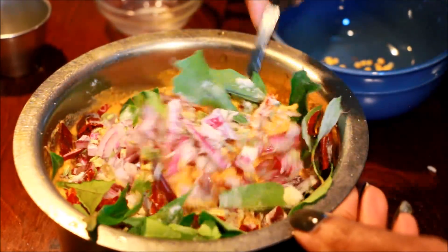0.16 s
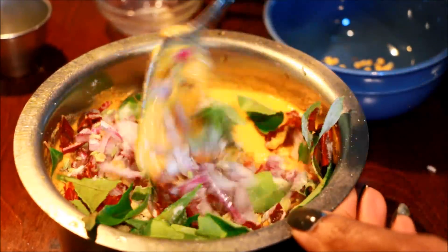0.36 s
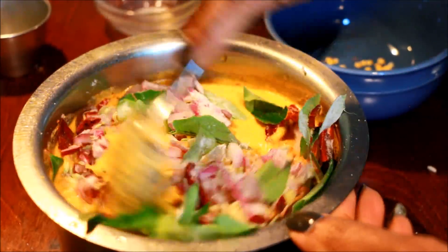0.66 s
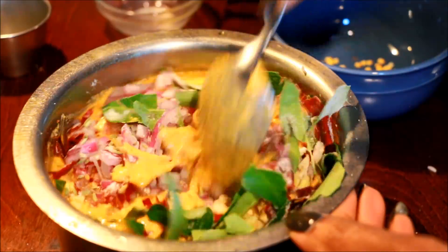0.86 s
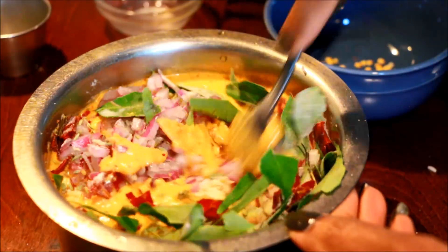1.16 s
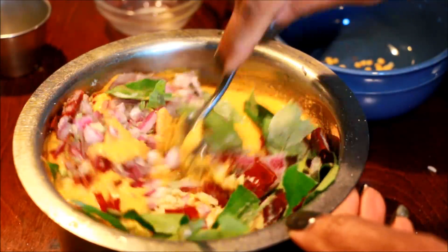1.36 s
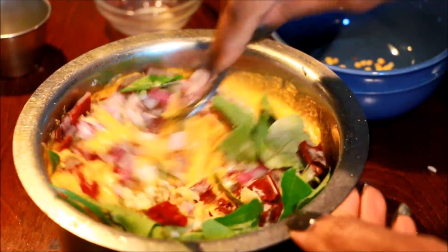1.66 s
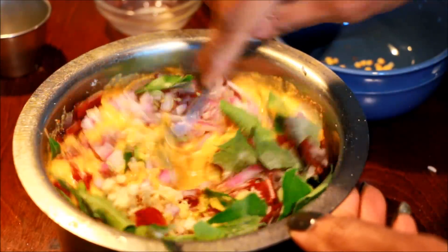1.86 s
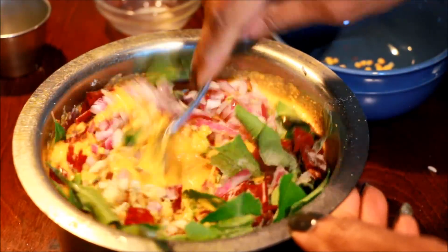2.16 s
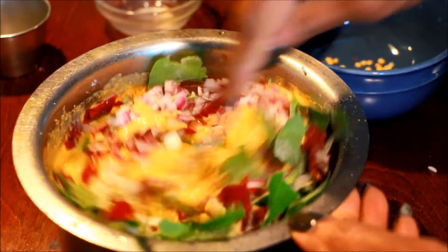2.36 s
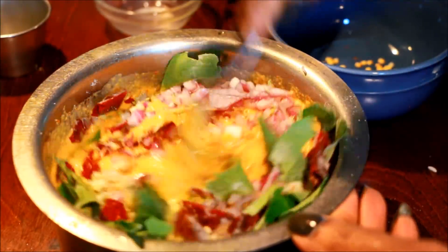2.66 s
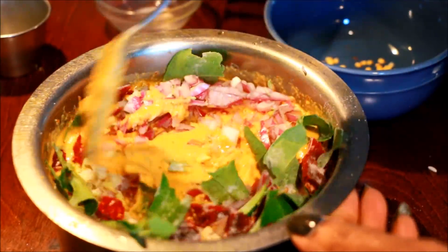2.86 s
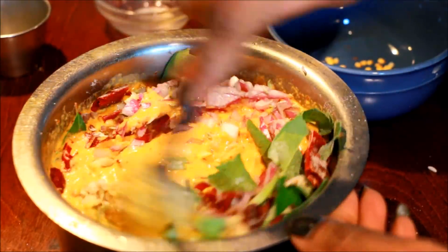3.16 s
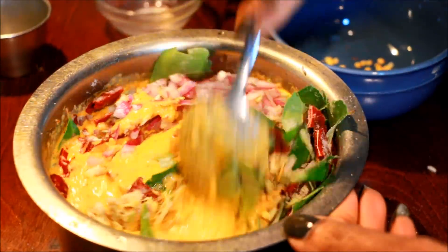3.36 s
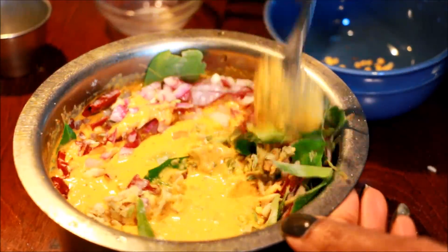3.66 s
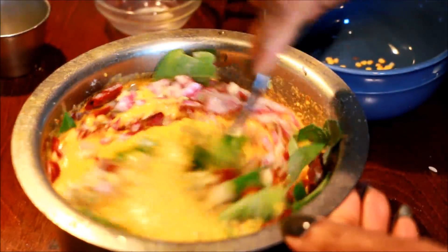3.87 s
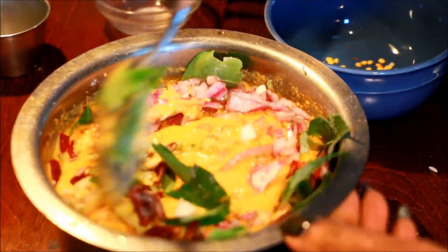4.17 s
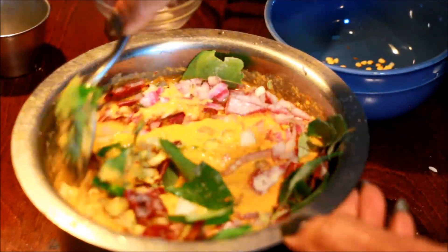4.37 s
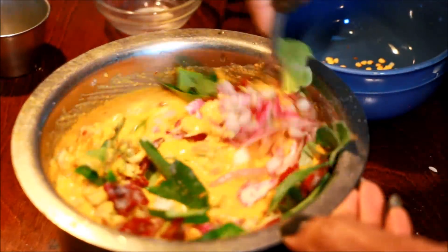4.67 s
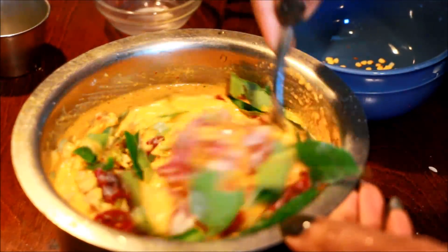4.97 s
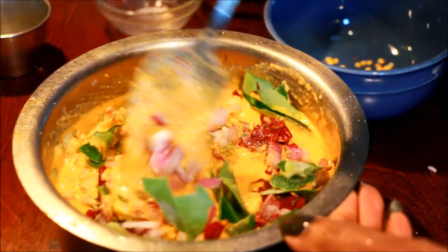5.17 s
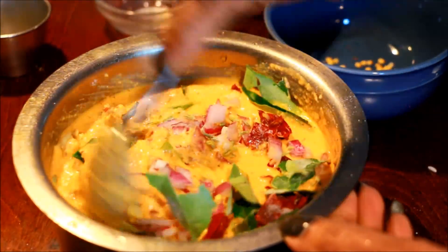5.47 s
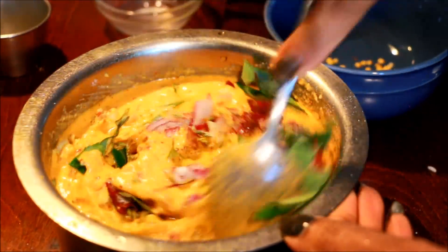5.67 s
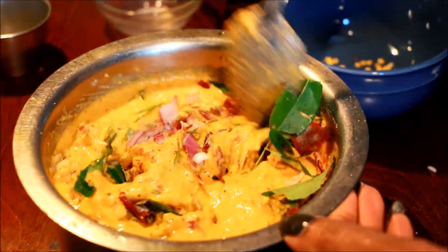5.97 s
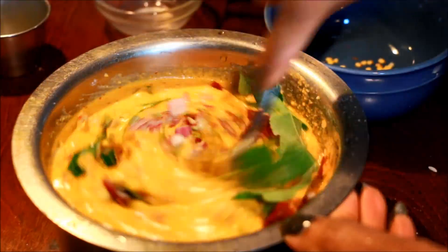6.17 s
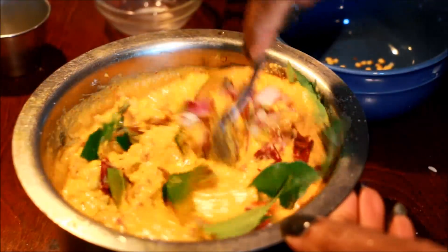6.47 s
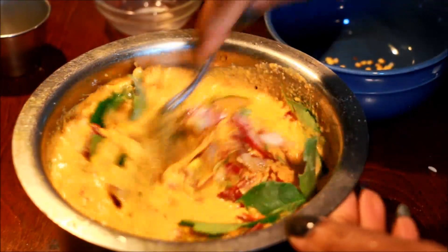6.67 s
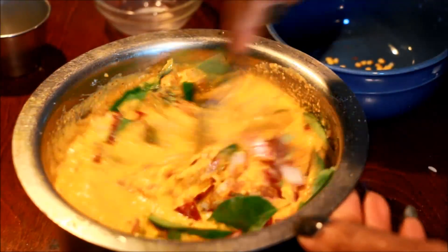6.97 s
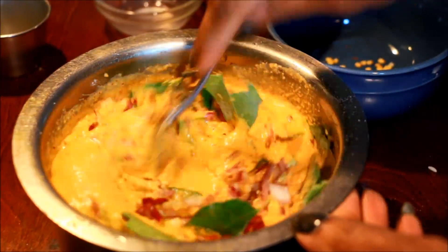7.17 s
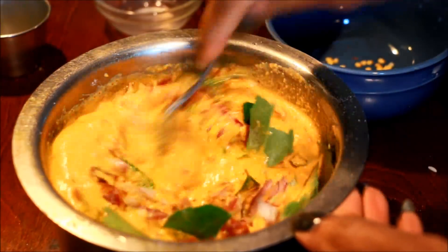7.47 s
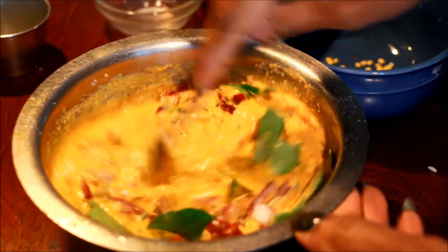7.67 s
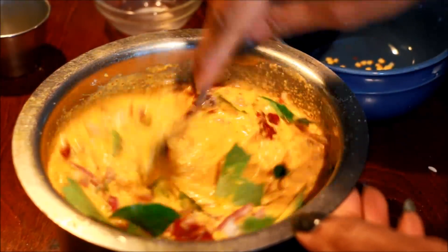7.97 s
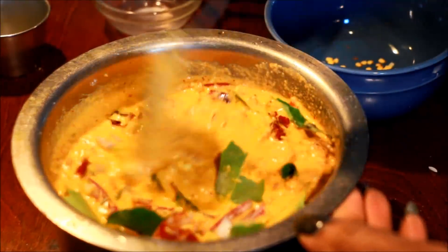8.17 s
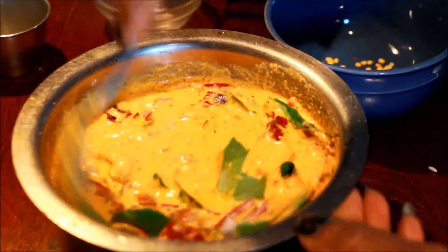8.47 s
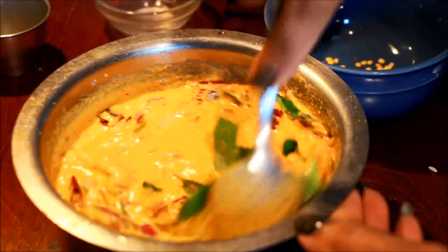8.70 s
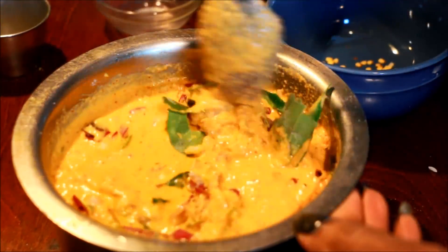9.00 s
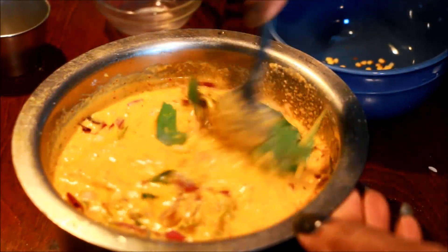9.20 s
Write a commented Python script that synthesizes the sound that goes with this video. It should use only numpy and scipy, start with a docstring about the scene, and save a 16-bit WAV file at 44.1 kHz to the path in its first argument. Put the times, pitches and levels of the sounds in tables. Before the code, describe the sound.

In a quietly humming kitchen, thick batter crackles and squelches softly as a metal spoon folds through it. Three bursts of scraping, damped knocking and clinking on the steel bowl follow, the second short and the last longest, with gentle wet stirring between them. The bowl thumps lightly on the table, two faint squeaks slip in, and everything is muted for a moment after the second burst. The microphone is close.

```python
"""A steel spoon stirs thick batter in a steel bowl on a wooden table, close to a small stereo microphone.
The spoon knocks and drags on the batter-damped wall; its edge hisses and clinks on the bare steel above.
Air pockets in the batter crackle, smack and squelch, the bowl bumps the table, and twice there is a
faint squeak. A quiet kitchen hums behind; once the whole sound is muted for a moment."""
import sys
import numpy as np
from scipy import signal
from scipy.io import wavfile
from scipy.ndimage import uniform_filter1d

SR = 44100
rng = np.random.default_rng(int(sys.argv[2]) if len(sys.argv) > 2 else 0)


def digitize_waveform(pressure):
    """Quantize a signal to 16-bit integers and store it at the path in sys.argv[1].

    Rows of a 2-D input are taken as channels; values are limited to [-1, 1].
    """
    field = np.atleast_2d(pressure).T
    bounded = np.clip(field, -1, 1)
    quanta = np.round(bounded * 32767).astype(np.int16)
    wavfile.write(sys.argv[1], SR, quanta)


N = 411894

# Levels are fader settings ahead of the mix; favour_hz is the pitch the struck spot brings out.
# the bowl's body, damped by batter and hand: pitch_hz, level_db, t60_s
BOWL_MODES = [(195, -22.5, 0.074), (280, -17.5, 0.16), (307.5, -13.5, 0.11), (335, -3, 0.19),
              (362.1, -9, 0.19), (385, -2.5, 0.2), (485.3, 5, 0.069), (553, -7.5, 0.12), (680, 3, 0.055),
              (790, 3, 0.038), (981, 5, 0.035), (1131, 3, 0.032), (1288, -7, 0.092), (1522, -12, 0.16),
              (1792, 0, 0.035), (2340, -15, 0.049), (2590, -26.5, 0.074), (3330, -49.5, .06),
              (3700, -33, .05), (4210, -35, 0.046)]
# the bare upper wall, singing under the edge: pitch_hz, width_hz, level_db
WALL_TONES = [(1300, 28, -9), (1600, 38, 0), (1810, 37, -6.5), (2110, 55, -0.5), (2340, 45, -6.5),
              (2600, 49, -2.5), (2773, 33, -3), (3030, 40, -5), (3250, 37, -3), (3460, 40, -6),
              (3650, 39, 1.5), (3860, 31, 3.5), (4210, 43, 2.5), (4740, 49, -4), (5140, 70, -5),
              (5640, 36, -1), (6490, 55, -4.5), (6900, 60, -8), (7430, 50, -8.5)]
# the table top under the bowl: pitch_hz, level_db, t60_s
TABLE_MODES = [(138, -2, 0.24), (178, 0, 0.073)]
# dips where neighbouring modes cancel: pitch_hz, width_hz
HOLLOWS = [(440, 21), (600, 24), (900, 32)]
# the spoon folds through the batter: start_s, length_s, hiss_db, treble_offset_db, drag_db
FOLDS = [(0.304, 0.21, -78, 0, -62), (0.603, 0.34, -64, 8, -64.5), (0.804, 0.3, -74, 11, -74),
         (0.975, 0.55, -64.5, -0.5, -65), (2.97, 0.46, -72.5, 16, -68), (3.58, 0.33, -60, 4.5, -70),
         (3.85, 0.34, -73.5, 12, -62), (4.783, 0.36, -74, 10, -83), (5.732, 0.5, -65, 8.5, -86),
         (6.23, 0.15, -57.5, 1, -81), (6.284, 0.29, -56.5, -4, -73), (6.488, 0.3, -66.5, -1, -62.5),
         (6.82, 0.29, -69, -16, -59), (8.724, 0.32, -65, 8.5, -51.5), (8.883, 0.48, -63.5, -10, -57)]
# the edge scrapes the wall: start_s, length_s, hiss_db, treble_offset_db, drag_db, hardness_share
SCRAPES = [(1.527, 0.061, -53, -5, -36, 0.3), (1.6, 0.081, -81, 16, -64, 0),
           (1.733, 0.081, -46.5, 0.5, -39.5, 0.82), (1.81, 0.087, -64, 0, -36, 0.21),
           (1.913, 0.13, -60, -4, -37.5, 0.18), (1.943, 0.031, -60, -5, -60, .3),
           (2.11, 0.021, -50.5, -0.5, -60, .3), (2.231, 0.013, -55, 0, -60, .3),
           (2.069, 0.077, -55.5, -9, -37.5, 0.24), (2.15, 0.056, -67, -6, -40, 0.16),
           (2.22, 0.068, -70, -15, -39.5, 0.36), (2.322, 0.096, -53, -3, -38.5, 0.14),
           (2.412, 0.081, -41, -2.5, -44.5, 0.4), (2.497, 0.13, -46.5, -1.5, -38, 0.48),
           (3.887, 0.06, -72, -17, -48, 0.1), (4.378, 0.048, -65, -3, -45, 0.1),
           (4.444, 0.12, -64, 6, -51.5, 0.27), (4.587, 0.065, -49.5, -4.5, -41.5, 0.54),
           (4.665, 0.068, -49.5, -0.5, -32.5, 0.35), (4.748, 0.029, -47.5, -4, -36.5, 0.45),
           (6.714, 0.14, -73, -12, -48.5, 0.5), (7.089, 0.015, -53, -2, -25, 0.8),
           (7.15, 0.17, -74, -5, -48, 0.15), (7.351, 0.037, -58, -11, -38, 0.6),
           (7.397, 0.15, -66, -14, -43.5, 0.13), (7.572, 0.08, -57, -7, -46, 1),
           (7.65, 0.097, -69, -11, -42, 0.1), (7.732, 0.045, -38.5, -8.5, -40.5, 1),
           (7.771, 0.067, -45.5, 5, -39, 0.7), (7.841, 0.044, -56, -4, -41, 1),
           (7.895, 0.13, -44, -4.5, -41.5, 0.53), (8.019, 0.066, -45.5, 2.5, -46, 0.45),
           (8.072, 0.072, -48.5, -2, -41, 1), (8.129, 0.12, -49.5, -7.5, -38.5, 0.43),
           (8.244, 0.023, -39.5, -4, -60, .2), (8.283, 0.046, -45, -0.5, -37.5, 0.6),
           (9.296, 0.034, -54, -20, -52, 0.2)]
# release as the edge lifts, a row each for low hiss, high hiss, soft drag, hard drag: t60_s
LIFT_T60_S = [
    [0.18],
    [0.08],
    [0.15],
    [0.063],
]
# the dragged bowl's note sinks as the batter loosens: time_s, favour_hz
DRAG_NOTE = [(2.7, 378.2), (7.0, 348.3)]
# tone colour of the edge's hiss: pitch_hz, density_db
EDGE_COLOUR = [(530, -23.5), (900, -8.5), (990, -5.5), (1380, -6), (1580, -4.5), (1890, -3), (2130, -4),
               (4120, -6), (4930, -8), (10900, -12), (15700, -19.5)]
# short slips of the edge: start_s, level_db, treble_offset_db
SLIPS = [(1.1558, -40, -6), (1.541, -24.5, -27), (1.689, -45, 7), (1.7447, -29, -15), (1.8672, -33, -14),
         (1.959, -25, -7.5), (1.9865, -29, -5), (2.249, -34, 5), (2.356, -50, -10), (2.405, -30, 5),
         (3.1882, -56, 2), (3.676, -38, 2), (3.8412, -32, -12), (3.863, -31, -14), (3.8901, -35, -10),
         (4.421, -33, -5), (4.56, -33, -23), (4.5787, -23, -13), (4.6094, -35, -9), (4.6776, -47, 10),
         (4.727, -36, 4), (6.2148, -42, -8), (6.2687, -35, -3), (6.3904, -41, -6), (6.556, -43, 3),
         (6.6253, -61, -7), (6.7471, -35, -16), (6.8513, -53, -17), (7.1114, -48.5, 14), (7.118, -52, 6),
         (7.226, -40, 0), (7.351, -36, -19), (7.3786, -32, -7), (7.39, -39.5, 7), (7.4884, -44, -7),
         (7.504, -39, -1), (7.6425, -40, 9), (7.7478, -33, -12), (7.7672, -39, -11), (7.9129, -55, -7),
         (8.0225, -20.5, -20), (8.108, -26, -6), (8.2615, -28, -14), (8.307, -33, -7), (9.3322, -21.5, -19)]
# tone colour of the kitchen's hum: pitch_hz, density_db
ROOM_TONE_COLOUR = [(12, -29.5), (20, -5), (116, 3), (186, -6.5), (335, -4), (523, -11), (773, -12),
                    (1240, -17.5), (1550, -16.5), (3210, -42.5), (4240, -24), (9260, -25.5), (15700, -32)]
# how alike left and right are in the noise layers: pitch_hz, likeness_share
STEREO_LIKENESS = [(60, 1), (400, 0.75), (1000, 0.39), (2500, 0.25), (6000, 0.036), (15000, 0.28)]
# the kitchen's reverb time: pitch_hz, t60_s
KITCHEN_DECAY = [(200, 0.29), (1000, 0.46), (4000, 0.044), (14000, 0.21)]
# air pockets burst: start_s, level_db, pitch_hz
SMACKS = [(0.0993, -37, 4400), (0.1331, -47, 2650), (0.7662, -52, 2070), (2.968, -50, 7500),
          (3.17, -39, 5500), (3.189, -39, 4600), (3.265, -40, 4800), (3.341, -46, 11000),
          (3.865, -36.5, 1740), (4.423, -34, 2860), (4.878, -33, 8060), (5.967, -44, 2480),
          (6.2155, -40.5, 1970), (6.2937, -47, 2690), (6.346, -41, 2910), (6.3895, -32, 2020),
          (6.452, -45, 2520), (6.557, -45, 4620), (6.6253, -46, 1540), (6.853, -48, 4000),
          (6.887, -45, 2810), (7.008, -41, 10100), (7.4884, -39, 1600), (7.5032, -32.5, 5330),
          (7.5142, -35, 1460), (9.3327, -38, 1900)]
# air pockets are pressed: start_s, length_s, first_hz, last_hz, level_db
SQUELCHES = [(0.652, .06, 1520, 2100, -56), (0.741, 0.07, 2250, 1930, -54), (.72, 0.11, 4700, 4540, -57),
             (0.88, 0.047, 2500, 3180, -56), (1.149, 0.17, 2980, 2600, -59), (3.037, 0.15, 2700, 6000, -62),
             (3.139, 0.18, 4900, 4700, -56), (3.4, 0.049, 2100, 2110, -58), (5.881, 0.26, 2510, 2600, -60),
             (5.957, 0.062, 2500, 1930, -57), (6.04, 0.11, 3700, 3490, -60),
             (6.273, 0.053, 2690, 2600, -53), (6.389, 0.085, 4230, 3980, -53.5),
             (6.392, 0.044, 2110, 2040, -54), (6.432, .07, 2400, 2690, -56),
             (6.442, 0.068, 3700, 3550, -54), (6.458, .04, 4500, 4750, -53), (8.813, 0.16, 4960, 4010, -54)]
# the spoon knocks the wall, then damps it: start_s, level_db, favour_hz, tilt_db_per_octave, free_ms
KNOCKS = [(1.408, -43.5, 377, 12, 25), (1.538, -22, 463, 4, 18), (1.547, -17, 468, -0.5, 8.5),
          (1.559, -21.5, 364, 2, 10), (1.576, -35, 374, 0, 18), (1.598, -39, 343, -5, 30),
          (1.742, -14, 382.5, 3.5, 19.3), (1.753, -19, 369, -2, 13), (1.768, -29, 400, -8, 16),
          (1.858, -32, 365, -13, 22), (1.886, -34, 362, -5, 15), (1.956, -21.5, 365, 13, 24),
          (1.968, -24, 383, -3, 17), (1.986, -24, 391, 13, 18), (2.018, -31, 373, 0, 16),
          (2.058, -31.5, 355, -8, 25), (2.1, -26.5, 340, 10, 14), (2.11, -25.5, 372, -1, 14),
          (2.302, -27, 370, -4, 25), (2.337, -32, 322, 8, 13), (2.358, -22.5, 338, 9, 12),
          (2.370, -24.5, 356, -5, 16), (2.389, -27.5, 393, 4, 14), (2.522, -37, 380, 3, 31),
          (2.546, -31, 500, 7, 15), (2.587, -40, 387, -11, 28), (2.632, -34.5, 380, -1, 20),
          (2.657, -33, 382, -4, 14), (3.743, -43, 392, -6, 31), (3.864, -24, 300, -3, 23),
          (3.892, -27, 464, 3.5, 15), (4.579, -17, 670, -1.5, 19), (4.587, -15, 351, -7, 22),
          (4.598, -27.5, 670, -0.5, 31), (4.615, -27.5, 360, 0, 20), (4.676, -29, 335, 24, 28),
          (4.741, -30.5, 356, -13, 20), (4.983, -45.5, 314, 4, 28), (5.666, -44, 335, 9, 28),
          (6.297, -46.5, 390, -5, 30), (6.475, -37, 333, 8, 40), (6.747, -35.5, 710, 1, 20),
          (6.8, -35, 365, -12, 18), (6.817, -31.5, 376, 2, 30), (7.103, -12, 316, -3.5, 24),
          (7.107, -24.5, 278, -7, 33), (7.112, -35, 470, 6, 26), (7.137, -23, 337, -1, 14),
          (7.156, -32, 328, -6, 12), (7.196, -34, 323, -7, 14), (7.243, -26, 636, -2.5, 21),
          (7.244, -36, 514, -8, 15), (7.325, -39.5, 403, -15, 45), (7.351, -24.5, 374, 6.5, 14),
          (7.366, -21.5, 361, -5, 30), (7.513, -33.5, 383, 27, 23), (7.556, -28.5, 361, 8.5, 29),
          (7.604, -32.5, 360, -11, 25), (7.695, -25.5, 395, -1, 29), (7.762, -25, 970, -1, 30),
          (7.79, -20.5, 510, 14, 22), (7.806, -36, 362, -7, 20), (7.908, -30, 680, 10, 22),
          (7.917, -30, 335, 14, 24), (7.942, -36, 335, -1, 29), (8.012, -28, 830, 6, 20),
          (8.032, -23.5, 486, 12, 13), (8.094, -29, 810, -4, 25), (8.125, -36, 790, 4, 36),
          (8.152, -38, 380, -5, 25), (8.269, -26.5, 370, 11, 18), (8.805, -38.5, 520, 9, 29),
          (8.861, -41, 326, 14, 33)]
# the bowl bumps the table: start_s, level_db
BUMPS = [(1.551, -41), (2.524, -33.5), (3.892, -32), (5.703, -51), (6.747, -43.5), (7.104, -65),
         (7.351, -38.5), (8.86, -51)]
# the edge catches the bare wall: start_s, level_db, favour_hz
CLINKS = [(1.545, -55, 2200), (1.755, -40, 2800), (1.765, -38, 3710), (1.776, -40, 2790),
          (1.791, -41, 4200), (1.795, -50, 5640), (1.823, -48, 3230), (1.82, -37.5, 2100),
          (1.871, -46, 2800), (1.985, -47, 2100), (1.99, -37, 1300), (1.96, -41, 3650), (2.12, -42, 1810),
          (2.135, -47, 3700), (2.355, -42, 1810), (2.46, -40, 2110), (2.56, -44, 2340), (2.625, -44, 2110),
          (2.253, -43.5, 3250), (2.41, -40, 3200), (2.445, -38, 4210), (2.47, -38, 3300), (2.48, -39, 2600),
          (2.531, -42, 1300), (4.58, -48, 1810), (4.579, -38, 2800), (4.61, -40, 2800), (4.63, -41, 3300),
          (4.685, -41, 3230), (4.728, -39.5, 2340), (4.768, -46, 3830), (4.77, -42, 4210),
          (4.772, -37, 2720), (4.775, -37.5, 2280), (5.97, -47, 2500), (5.995, -53, 2110),
          (6.295, -50, 2600), (6.345, -50, 2900), (6.408, -46, 4210), (6.445, -53, 2600),
          (6.462, -50, 2600), (6.47, -51, 3650), (6.478, -51, 4700), (7.765, -28.5, 1300),
          (7.769, -33, 2600), (7.795, -39, 1620), (7.81, -44, 6490), (7.856, -35.5, 2110),
          (7.92, -42, 1300), (7.965, -39, 2110), (8.03, -35, 1300), (8.036, -42, 2800), (8.106, -32, 2110),
          (8.109, -33, 4200), (8.263, -34, 2700), (8.263, -40, 3230), (8.309, -43, 2600)]
# faint squeaks: start_s, length_s, pitch_hz, level_db
SQUEAKS = [(4.078, 0.3, 1480, -58.5), (6.728, 0.35, 1560, -58)]

SOFT_HARDNESS, BITE_S = 0.19, 0.029
SLIP_RISE_MS, SLIP_T60_S = 4.9, 0.054
WALL_DB, WANDER_DB, CRACKLE_DB = -3, 3.5, -10
ROOM_TONE_DB, REVERB_DB = -55.5, -9.0
SQUELCH_WIDTH = 0.3  # share of the first pitch
KNOCK_RISE_MS, JUDDER_MS, SPOON_DAMP_DB, THUMP_DB = 5.4, 8.7, 9.5, -34.
CLINK_SPREAD_OCT, RASP_MS = 0.089, 6.5
MUTE_START_S, MUTE_END_S, TOP_HZ = 5.370, 5.602, 15780


def amp(db):
    """Decibels to gain."""
    return 10 ** (np.asarray(db) / 20)


def unit_rms(x):
    """Bring a layer to an RMS of one."""
    return x / np.sqrt(np.mean(x ** 2) + 1e-20)


def curve_at(points, hz):
    """Read a curve along a log pitch axis."""
    pitches, values = np.transpose(points)
    return np.interp(np.log(hz + 1), np.log(pitches + 1), values)


def add(mix, start_s, sound):
    """Lay a sound into the track."""
    part = mix[round(start_s * SR):][:len(sound)]
    part += sound[:len(part)]


def modes(table, detune=1):
    """One dying sine for each mode."""
    hz, db, t60 = np.transpose(table)[:, :, None]
    t = np.arange(SR // 4) / SR
    return amp(db - 60 * t / t60) * np.sin(2 * np.pi * hz * detune * t)


def stereo_noise(colour, patchy_db, size):
    """Coloured noise with drifting patches, centred in the bass and wide in the treble."""
    hop, hz = size // 4, np.fft.rfftfreq(size, 1 / SR)
    a, b, c, d, patches = rng.standard_normal((N // hop + 5, len(hz), 5)).T
    patches = unit_rms(uniform_filter1d(uniform_filter1d(patches, size=3, axis=0), size=14, axis=1))
    likeness = np.clip(curve_at(STEREO_LIKENESS, hz), 0, 1)[:, None]
    left = a + 1j * b
    right = likeness * left + np.sqrt(1 - likeness ** 2) * (c + 1j * d)
    spectra = np.array([left, right]) * amp(curve_at(colour, hz)[:, None] + patchy_db * patches)
    return unit_rms(signal.istft(spectra, nperseg=size, noverlap=size - hop)[1][:, :N])


def grit(per_s, spread_db):
    """Random tiny ticks, as of steel catching on steel; a few are large."""
    size = amp(spread_db * np.minimum(rng.exponential(1, N), 5)) * rng.choice([-1, 1], N)
    return unit_rms(size * (rng.random(N) < per_s / SR))


def stroke_gains(hiss_db, treble_db, drag_db, hardness=SOFT_HARDNESS):
    """Faders for low hiss, high hiss, soft drag and hard drag."""
    hard = np.clip(hardness, 0, 1)
    return amp([[hiss_db], [hiss_db + treble_db], [drag_db], [drag_db]]) * [[1], [1], [1 - hard], [hard]]


def stirring():
    """Envelopes over a light glide: scrapes bite, hold and die as the edge lifts; folds swell and sink."""
    gains = stroke_gains(hiss_db=-64.5, treble_db=-1.5, drag_db=-65) * np.ones(N)
    for start_s, length_s, *levels in SCRAPES:
        t = np.arange(0, length_s + .4, 1 / SR)
        release = amp(-60 * np.maximum(t - length_s, 0) / LIFT_T60_S)
        envelope = np.minimum(t / BITE_S, 1) * release
        add(gains.T, start_s, (stroke_gains(*levels) * envelope).T)
    for start_s, length_s, *levels in FOLDS:
        add(gains.T, start_s, (stroke_gains(*levels) * np.hanning(round(length_s * SR))).T)
    return gains


def bowl_ring(favour_hz, octaves, tilt_db=0, detune=1, pull=0):
    """The bowl's answer to a tap; the modes near the favoured pitch move most."""
    apart = np.log2(np.transpose(BOWL_MODES)[0] / favour_hz)
    share = amp(tilt_db * np.clip(apart, -1, 1)) / (1 + (apart / octaves) ** 2)
    share *= 1 + 1.87 * np.exp(-(apart / 0.082) ** 2)  # the nearest mode is struck on its belly
    # spoon and batter load the wall and pull the near modes part of the way to that pitch
    bend = 2 ** (-pull * apart * np.exp(-(apart / 0.25) ** 2))
    return share @ modes(BOWL_MODES, detune * bend[:, None])


def spoon_drag(soft, hard):
    """Catches under the moving spoon keep the bowl sounding; bare steel wakes the higher modes."""
    (early_s, early_hz), (late_s, late_hz) = DRAG_NOTE
    rings = np.array([bowl_ring(early_hz, octaves=0.4, pull=0.62),
                      bowl_ring(late_hz, octaves=0.49, pull=0.34),
                      bowl_ring(877.0, octaves=0.52)])
    rings /= np.linalg.norm(rings, axis=1, keepdims=True)
    loosened = np.interp(np.arange(N) / SR, [early_s, late_s], [0, 1])
    catches = grit(per_s=700, spread_db=2.4) * np.array([soft * (1 - loosened), soft * loosened, hard])
    rub = signal.oaconvolve(catches, rings, axes=1).sum(0)[:N]
    # a low cut keeps the drag's ring free of bass rumble
    return signal.sosfilt(signal.butter(6, 295., "high", fs=SR, output="sos"), rub)


def singing_wall(noise):
    """As the spoon travels, now one wall tone and now another comes forward in the hiss."""
    sung = np.zeros_like(noise)
    for hz, width_hz, db in WALL_TONES:
        steps = rng.standard_normal(N // 1500 + 2)
        wander = np.interp(np.arange(N) / 1500, np.arange(len(steps)), steps)
        tone = signal.lfilter(*signal.iirpeak(hz, hz / width_hz, SR), noise)
        sung += amp(db + WANDER_DB * wander) * tone
    return amp(WALL_DB) * sung


def edge_hiss(low_gain, high_gain):
    """The edge hisses with the stroke and in short slips, flickering with the grit."""
    body, treble = low_gain.copy(), high_gain.copy()
    t = np.arange(6000) / SR
    attack = 1 - np.exp(-1000 * t / SLIP_RISE_MS)
    slip = attack * amp(-60 * t / SLIP_T60_S) / 3  # noise peaks at about three times its RMS
    for start_s, db, treble_db in SLIPS:
        add(body, start_s - .002, amp(db) * slip)
        add(treble, start_s - .002, amp(db + treble_db) * slip)
    flicker = unit_rms(uniform_filter1d(abs(grit(per_s=610, spread_db=1.5)), size=90))
    noise = stereo_noise(EDGE_COLOUR, patchy_db=2.0, size=512) * (0.87 + 0.33 * flicker)
    noise += singing_wall(noise)
    lows = signal.oaconvolve(noise, signal.firwin(31, 4400, fs=SR)[None], "same")
    return body * unit_rms(lows) + treble * unit_rms(noise - lows)


def batter_crackle(gain):
    """Tiny bubbles and leaf bits pop while the spoon moves: grains of a few cycles, of many pitches."""
    out, t = np.zeros(N), np.arange(200) / SR
    pops = grit(per_s=500, spread_db=2.4)
    pitch_slot = rng.integers(0, 12, N)
    for slot, hz in enumerate(np.geomspace(2400., 12000., num=12)):
        grain = np.sin(2 * np.pi * hz * t) * np.exp(-t * hz / 2.8)
        out += signal.oaconvolve(pops * (pitch_slot == slot), grain)[:N]
    return amp(CRACKLE_DB) * gain * unit_rms(out)


def bowl_low_cut(x):
    """A small bowl sends out no deep bass."""
    return signal.sosfilt(signal.butter(4, 115., "high", fs=SR, output="sos"), x)


def bowl_hollows(x):
    """Between some modes the parts of the wall push against each other and little sound leaves."""
    for hz, width_hz in HOLLOWS:
        x = signal.lfilter(*signal.iirnotch(hz, hz / width_hz, SR), x)
    return x


def kitchen_reverb(x):
    """Sparse reflections, each band dying at its own speed; close microphone ports hear the bass alike."""
    taps = np.zeros((2, SR // 2))
    slots = np.arange(200, SR // 2 - 20, 20)
    arrivals = slots + rng.integers(0, 20, (2, len(slots)))
    np.put_along_axis(taps, arrivals, rng.choice([-1., 1.], arrivals.shape), 1)
    hz, t, spectra = signal.stft(taps, SR, nperseg=256)
    decay = amp(-60 * t / curve_at(KITCHEN_DECAY, hz)[:, None])
    tail = signal.istft(spectra * decay, SR, nperseg=256)[1]
    tail /= np.linalg.norm(tail[0])
    left, right = amp(REVERB_DB) * signal.oaconvolve(x, tail, axes=1)[:, :N]
    side = signal.lfilter(*signal.butter(1, 2800., "high", fs=SR), left - right)
    return np.array([left + right + side, left + right - side]) / 2


def room_tone():
    """The kitchen's quiet hum: a bed of bass-heavy noise."""
    return amp(ROOM_TONE_DB) * stereo_noise(ROOM_TONE_COLOUR, patchy_db=1.04, size=1024)


def batter_smacks():
    """A small air pocket bursts: a few cycles that rise in pitch."""
    out, t = np.zeros(N), np.arange(600) / SR
    for start_s, db, hz in SMACKS:
        chirp = np.sin(2 * np.pi * hz * t * (1 + 15 * t))
        add(out, start_s - .001, amp(db) * chirp * np.exp(-t * hz / 3.5))
    return out


def batter_squelches():
    """Lumpy noise in the gliding resonance of a shrinking or opening air pocket."""
    out = np.zeros(N)
    for start_s, length_s, first_hz, last_hz, db in SQUELCHES:
        hz = np.geomspace(first_hz, last_hz, round(length_s * SR))
        glide = np.sin(2 * np.pi * np.cumsum(hz) / SR)
        fuzz, lumps = rng.standard_normal((2, SR // 2))[:, :len(hz)]
        pole = np.exp(-np.pi * SQUELCH_WIDTH * first_hz / SR)
        fuzz = unit_rms(signal.lfilter([1], np.poly([pole, pole]), fuzz))
        lumps = amp(1.5 * unit_rms(uniform_filter1d(lumps, size=300)))
        add(out, start_s, amp(db) * fuzz * lumps * glide * np.sqrt(np.hanning(len(hz))))
    return out


def knocks_and_bumps():
    """A juddering blow rings the bowl, swelling as the spoon presses in; the table thumps below."""
    out, ms = np.zeros(N), 1000 * np.arange(SR // 4) / SR
    judders = rng.standard_normal((len(KNOCKS), 3000))
    # the batter lies differently at each blow and shifts every mode a little
    detunes = 1 + 0.005 * rng.standard_normal((len(KNOCKS), len(BOWL_MODES), 1))
    thump = modes(TABLE_MODES).sum(0) * (1 - np.exp(-ms / 1.1))
    thump /= abs(thump).max()
    for (start_s, db, favour_hz, tilt_db, free_ms), judder, detune in zip(KNOCKS, judders, detunes):
        force = 0.021 * judder * np.exp(-ms[:len(judder)] / JUDDER_MS)
        force[0] += 1  # the blow itself
        ring = bowl_ring(favour_hz, octaves=0.88, tilt_db=tilt_db, detune=detune, pull=0.44)
        knock = signal.fftconvolve(force, ring)[:len(ms)]
        settled = 1 / (1 + np.exp(-(ms - free_ms) / 2.5))  # the spoon comes to rest and damps the wall
        knock *= (1 - np.exp(-ms / KNOCK_RISE_MS)) * amp(-SPOON_DAMP_DB * settled)
        add(out, start_s - .003, amp(db) * (knock / abs(knock).max() + amp(THUMP_DB) * thump))
    for start_s, db in BUMPS:
        add(out, start_s - .003, amp(db) * thump)
    return out


def edge_clinks():
    """A short rasp of the edge rings the wall tones that the struck spot favours."""
    out, ms = np.zeros(N), 1000 * np.arange(1500) / SR
    hz, width_hz, level_db = np.transpose(WALL_TONES)
    t60_s = 2.2 / width_hz
    tones = modes(np.transpose([hz, level_db, t60_s]))[:, :4000]
    for start_s, db, favour_hz in CLINKS:
        rasp = rng.standard_normal(len(ms)) * ms * np.exp(-3 * ms / RASP_MS)
        ping = np.exp(-(np.log2(hz / favour_hz) / CLINK_SPREAD_OCT) ** 2) @ tones
        clink = signal.fftconvolve(rasp, ping)
        add(out, start_s - .002, amp(db) * clink / abs(clink).max())
    return out


def squeaks():
    """A faint fuzzy whistle: slow noise carried on a tone."""
    out = np.zeros(N)
    for start_s, length_s, hz, db in SQUEAKS:
        t = np.arange(0, length_s, 1 / SR)
        noise = rng.standard_normal(len(t))
        fuzz = unit_rms(uniform_filter1d(uniform_filter1d(noise, size=110), size=110))
        add(out, start_s, amp(db) * fuzz * np.sin(2 * np.pi * hz * t) * np.sqrt(np.hanning(len(t))))
    return out


def scene():
    """The mix: the bowl up close and a little to the left, the kitchen behind it."""
    low_hiss, high_hiss, soft_drag, hard_drag = stirring()
    close = bowl_low_cut(knocks_and_bumps() + spoon_drag(soft_drag, hard_drag))
    close += batter_smacks() + squeaks() + edge_clinks() + batter_squelches() + batter_crackle(high_hiss)
    close = bowl_hollows(close + edge_hiss(low_hiss, high_hiss))
    in_room = close + kitchen_reverb(close)
    left, right = in_room * amp([[.8], [-.8]]) + room_tone() * amp([[.4], [-.4]])
    return np.array([left, np.roll(right, 1)])  # the right side arrives one sample late


def record(dry):
    """The mix is muted for a moment, and a steep high cut takes off the very top."""
    t = np.arange(N) / SR
    gate = uniform_filter1d(((t < MUTE_START_S) | (t > MUTE_END_S)) * 1., size=60)
    high_cut = signal.firwin(1023, TOP_HZ, window=("kaiser", 9), fs=SR)
    return signal.oaconvolve(dry * gate, high_cut[None], "same")


dry = scene()
out = record(dry)
digitize_waveform(out)
```